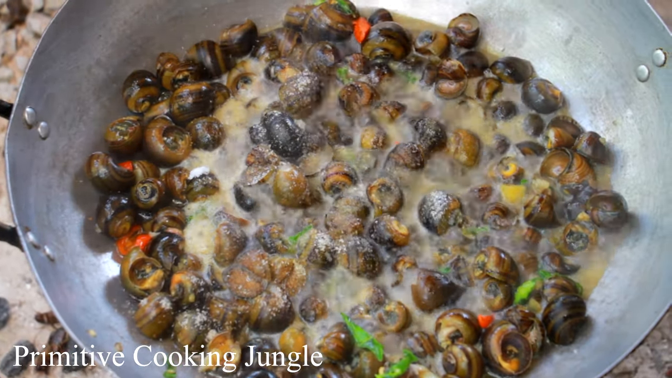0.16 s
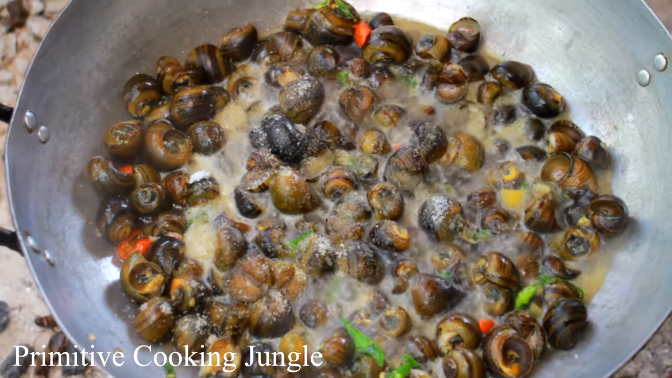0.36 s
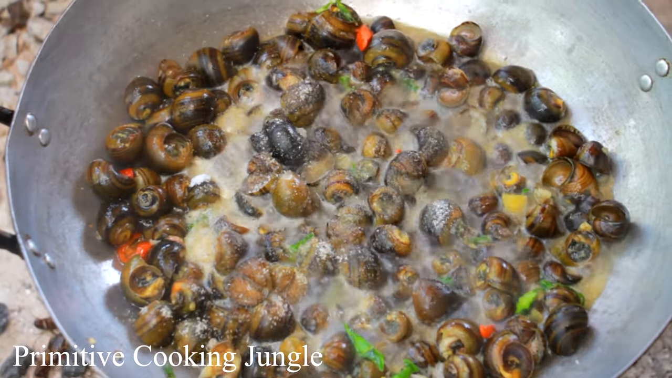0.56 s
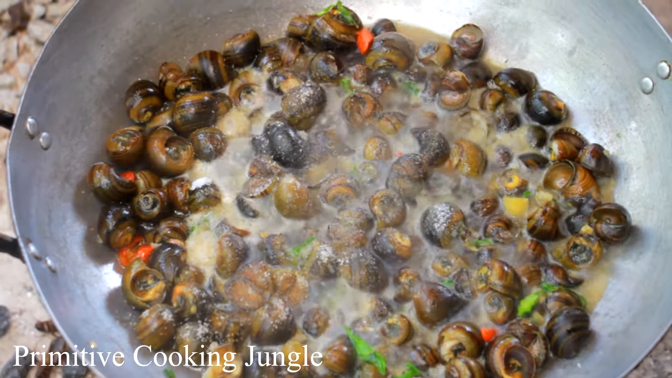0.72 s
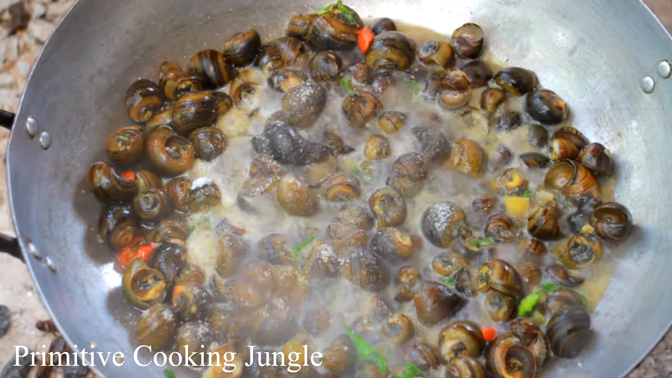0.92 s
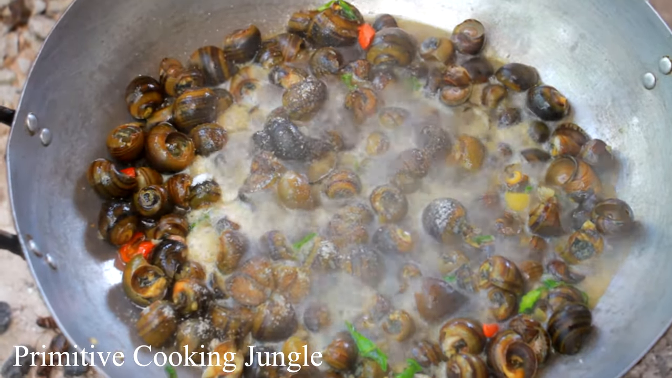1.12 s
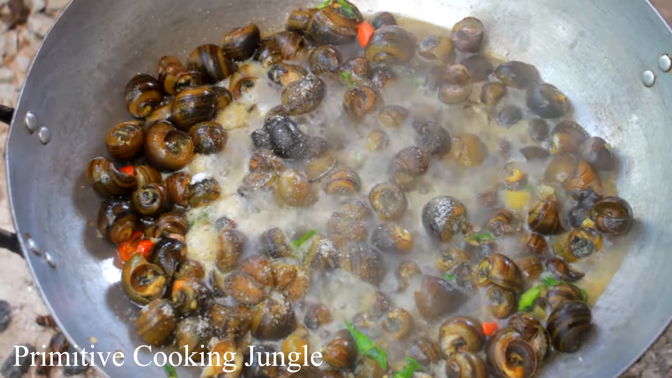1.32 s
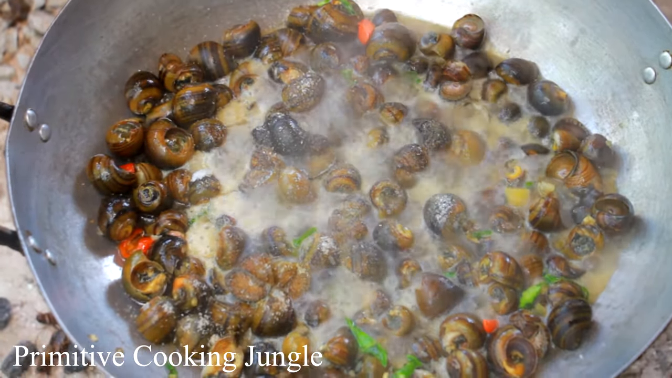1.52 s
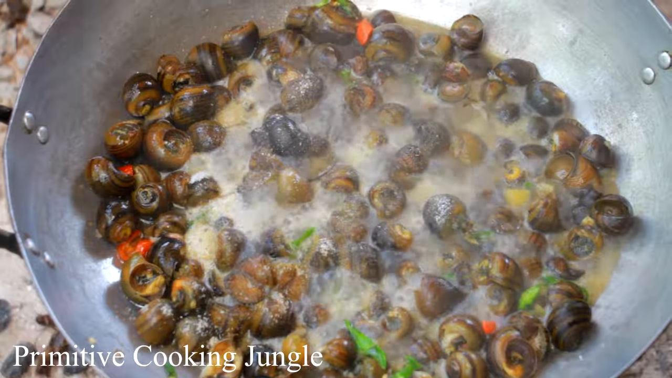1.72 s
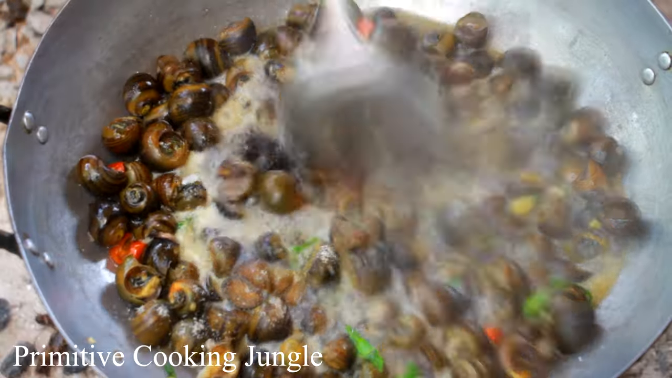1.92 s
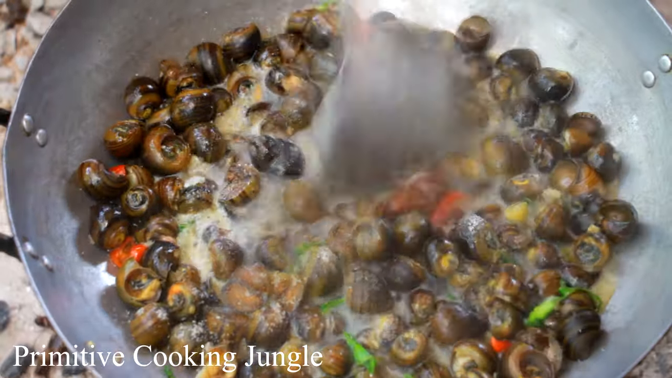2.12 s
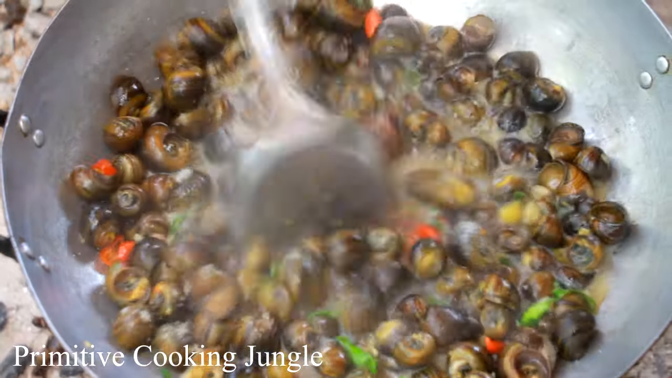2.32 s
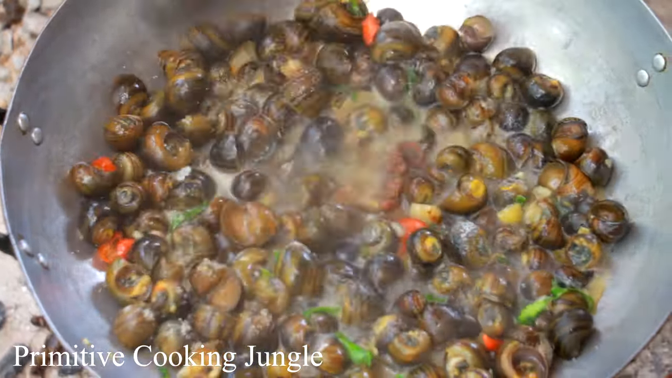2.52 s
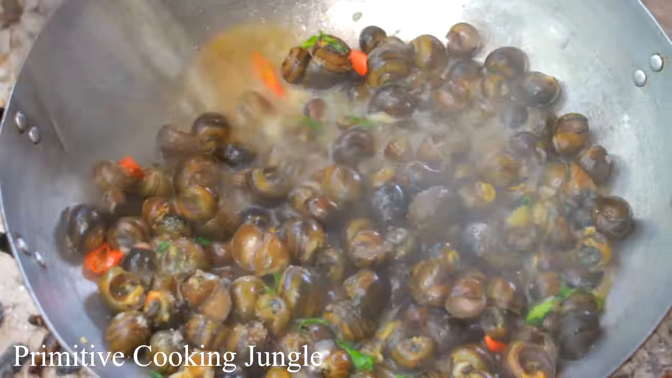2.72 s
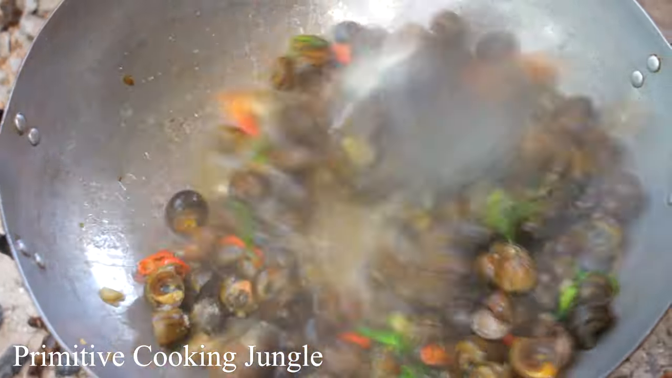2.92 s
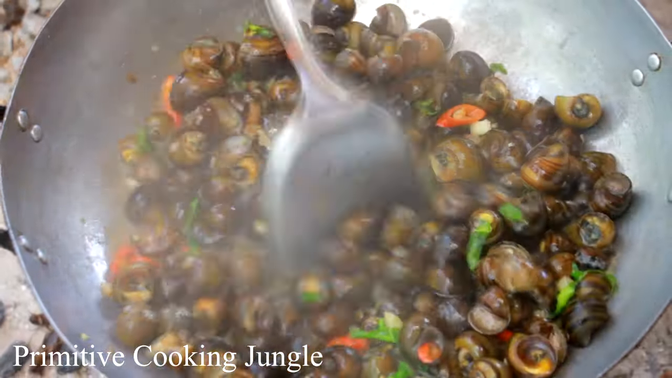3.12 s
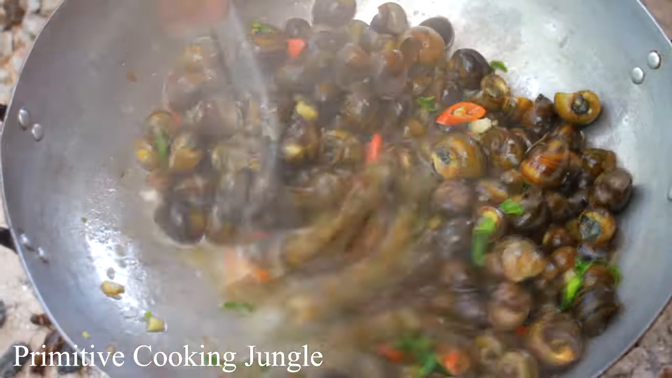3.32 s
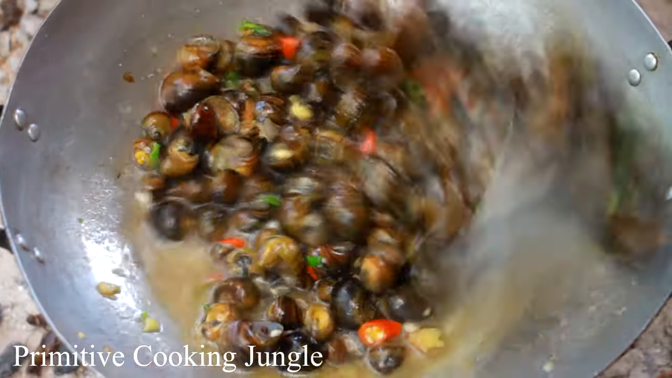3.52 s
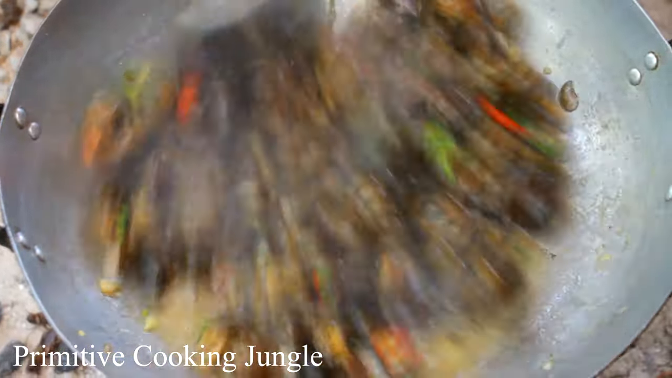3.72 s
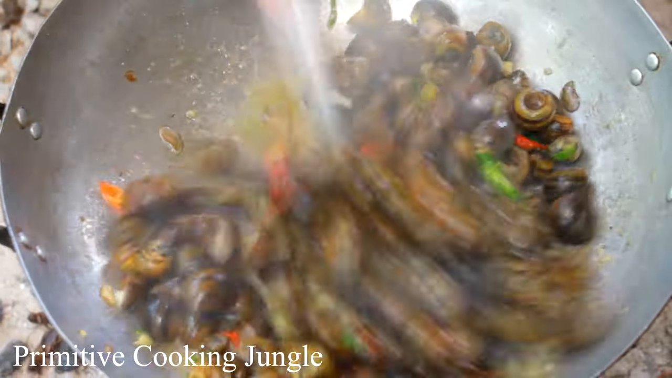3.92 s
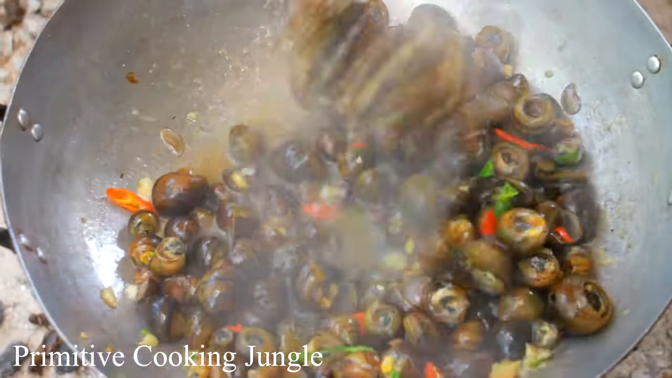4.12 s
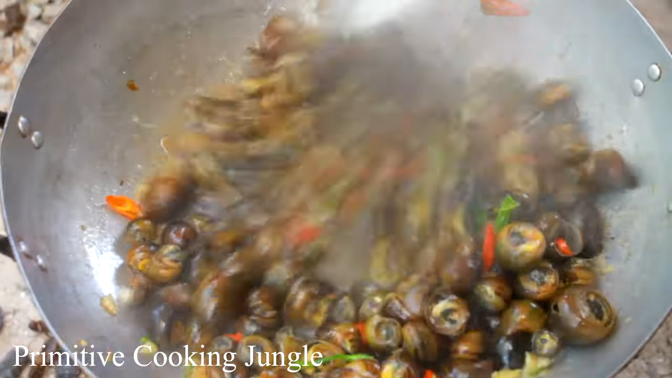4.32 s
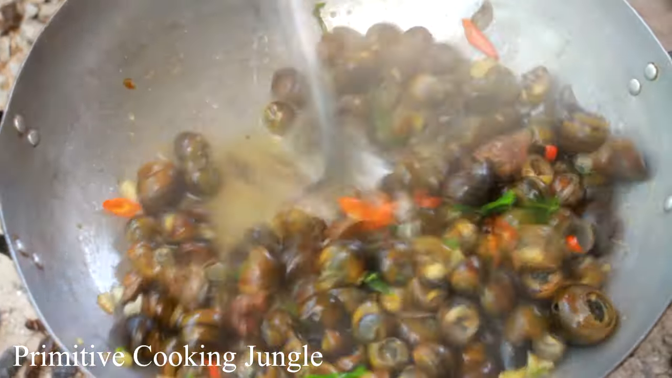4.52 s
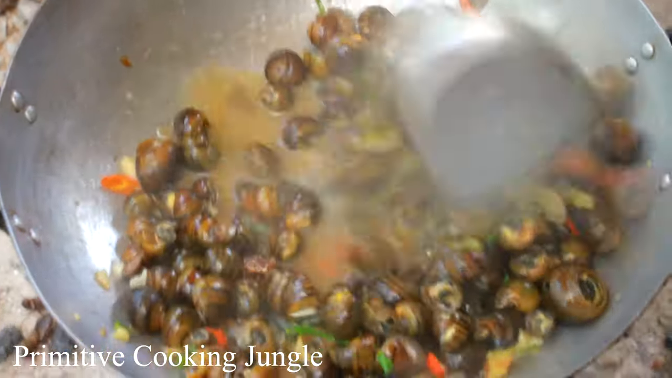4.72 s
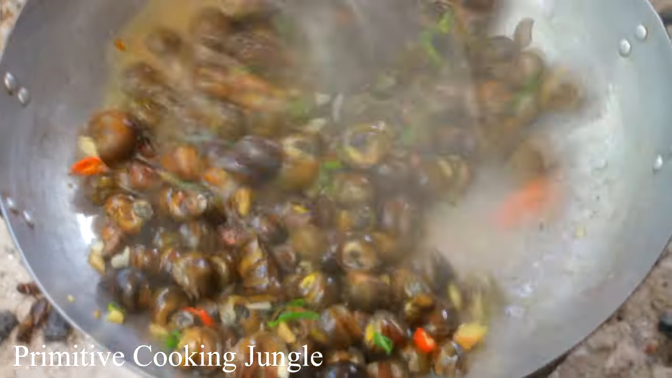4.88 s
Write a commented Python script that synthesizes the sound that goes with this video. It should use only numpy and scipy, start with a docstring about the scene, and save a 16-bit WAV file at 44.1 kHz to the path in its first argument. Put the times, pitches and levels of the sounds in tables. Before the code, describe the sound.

A close, dry, almost centred pickup of outdoor cooking. First comes a faint wet simmer, soft rumble and brief steam puffs, with hoarse falling bird whistles nearby. Then, from about 1.8 seconds, repeated ladle strokes make hundreds of hard little shells collide, scrape and tumble in a resonant metal pan. The strokes are much louder than the opening, crackly and irregular, with short settling rattles between and hardly any lingering ring.

```python
"""Outdoors, snails simmer in a metal wok while birds chirp nearby; then a steel ladle shovels through the
shells. Clatter: damped sine grains and noise, in bursts shaped by the bowl's resonances, plus hard ticks and
knocks. Birds: hoarse falling whistles with a short echo. Simmer: filtered noise with rising bubble grains, fire
rumble, steam and spits. The simmer and rumble grow fainter from about 2 s on."""
import sys
import numpy as np
from scipy import signal
from scipy.fft import rfft, irfft, next_fast_len
from scipy.io import wavfile
from scipy.ndimage import uniform_filter1d, map_coordinates

SR = 44100
rng = np.random.default_rng(int(sys.argv[2]) if len(sys.argv) > 2 else 0)


def to_wav(sig):
    """Store sig (one row per channel, or 1-D mono) as 16-bit WAV at the path in sys.argv[1].

    Samples outside -1..1 are clipped; the rate is SR.
    """
    pcm = np.clip(np.atleast_2d(sig), -1, 1) * 32767
    pcm = np.round(pcm).astype(np.int16)
    wavfile.write(sys.argv[1], SR, pcm.T)  # frames by channels


N = 222793
TOP_HZ = 15900
FADE_FROM_S, FADE_S = 2.05, 0.48  # fade start, time constant
SIMMER_DROP_DB = 12.5

# sharp shell ticks: start_s, relative_level_db, centre_hz
TICK_HITS = [(1.911, -20, 3460), (1.927, -15, 6000), (1.998, -10, 5830), (2.039, -14, 8400),
             (2.127, -8, 8200), (2.141, -0.5, 7500), (2.258, -14, 7760), (2.293, -1.5, 7650),
             (2.306, -4, 7700), (2.559, -4, 5160), (2.576, -1, 4120), (2.721, -26, 4000), (2.734, -8, 4300),
             (2.831, -20, 9500), (2.895, -15, 3430), (2.912, -20, 7540), (2.956, -10, 3470),
             (3.14, -7.5, 5900), (3.265, -6.5, 4000), (3.375, -18, 8300), (3.404, -16, 8000),
             (3.48, -20, 5030), (3.51, -6, 6150), (3.681, -18, 10800), (3.704, -0.5, 4450),
             (3.808, -15, 6540), (3.836, -12, 2440), (3.869, 1.5, 2740), (3.95, -7, 4760),
             (4.101, -11, 4200), (4.115, -14, 5040), (4.146, 0.5, 3030), (4.249, -20, 3840),
             (4.294, -18, 9500), (4.314, -4, 7640), (4.428, -14, 3100), (4.463, -18, 2480),
             (4.731, -7, 5000), (4.81, -19, 2540), (4.955, -0.5, 3600), (4.982, -13, 7500),
             (5.03, -18, 5950)]
# single knocks on the bowl: start_s, relative_level_db, pitch_hz
KNOCK_HITS = [(.516, -20, 904), (.516, -20, 1306), (0.517, -24.5, 356), (1.113, -21, 195),
              (1.124, -21.5, 412), (1.245, -16, 1190), (1.258, -20.5, 1324), (1.946, -18.5, 430),
              (2.114, -22.5, 2400), (2.15, -15.5, 402), (2.319, -18, 405), (2.411, -21, 4050),
              (2.435, -16, 428), (2.559, -19.5, 1360), (2.757, -18, 4090), (3.021, -15.5, 446),
              (3.14, -18, 480), (3.283, -17, 2490), (3.455, -28, 835), (3.945, -22, 1140),
              (4.193, -16, 3830), (4.21, -16.5, 3880), (4.954, -18.5, 1260)]
# steam spectrum: frequency_hz, relative_level_db
STEAM_SPECTRUM = [(3000, -28), (7000, 1), (11000, -5), (16000, -15)]


def amp(db):
    """Gain of a level in dB."""
    return 10 ** (np.asarray(db) / 20)


def unit(x):
    """x at rms 1."""
    return x / np.sqrt(np.mean(x ** 2) + 1e-20)


def along(points, hz):
    """Interpolate (Hz, value) points on a log frequency axis."""
    f, v = np.transpose(points)
    return np.interp(np.log(hz + 1), np.log(f + 1), v, left=v[0], right=v[-1])


def filtered(x, response):
    """x times a complex response of frequency."""
    m = next_fast_len(N + 8192)
    return irfft(rfft(x, m) * response(np.fft.rfftfreq(m, 1 / SR)), m)[..., :N]


def highpass(x, corner_hz):
    """Zero-phase fourth-power high-pass."""
    return filtered(x, lambda hz: hz ** 4 / (hz ** 4 + corner_hz ** 4))


def add(track, s, sound):
    """Mix a sound into the track from time s."""
    part = track[round(s * SR):][:len(sound)]
    part += sound[:len(part)]


def patchy(x, patchy_db):
    """x with patches of random gain in time and pitch."""
    z = signal.stft(np.pad(x, (0, 512)), nperseg=512)[2]
    field = uniform_filter1d(rng.standard_normal(z.shape), 5, 0)
    field = uniform_filter1d(field, 8, 1)
    return signal.istft(z * amp(patchy_db * unit(field)), nperseg=512)[1][:N]


def rush(spectrum, patchy_db):
    """Patchy noise of rms 1 with a given spectrum."""
    noise = patchy(rng.standard_normal(N), patchy_db)
    return unit(filtered(noise, lambda hz: amp(along(spectrum, hz))))


def grains(family, spiky_db, rise=0, count=6000):
    """Damped sines at random moments, pitches and sizes, rms 1; rise bends each pitch upward."""
    centre_hz, octaves, rate_per_s, cycles = family
    gap, big = rng.exponential(size=(2, count))
    start_s = np.cumsum(gap) / rate_per_s
    inside = start_s < N / SR
    pitch_hz = centre_hz * 2 ** (octaves * rng.standard_normal(count))
    pitch_hz = np.clip(pitch_hz, 150, 15000)[inside, None]
    t = np.arange(int(1.5 * cycles / centre_hz * SR)) / SR
    turns = pitch_hz * t
    decay = np.exp(-np.log(100) * turns / cycles)  # 40 dB down after these cycles
    ring = np.sin(2 * np.pi * turns * (1 + rise * turns / cycles)) * decay
    ring *= amp(spiky_db * np.minimum(big[inside, None], 3.5))
    at = (start_s[inside, None] * SR).astype(int) + np.arange(len(t))
    summed = np.bincount(at.ravel(), ring.ravel(), N + len(t))[:N]
    return unit(highpass(summed, centre_hz / 3))  # keep each family free of offset and deep bass


def faded(drop_db, fade_s):
    """Level in dB that sinks exponentially by drop_db from FADE_FROM_S on."""
    since_s = np.maximum(np.arange(N) / SR - FADE_FROM_S, 0)
    return -drop_db * (1 - np.exp(-since_s / fade_s))


def shells():
    """Each ladle push sets shells colliding and sliding: a fast rise, a hold, a decay to rest."""
    # shovel bursts: start_s, hold_s, clack_level_db, boom_over_clack_db
    bursts = [(1.751, 0.012, -38.5, 0), (1.818, 0.03, -38, 1), (1.887, 0.015, -35.5, 5),
              (1.908, 0.034, -27.5, -3), (1.994, 0.029, -33.5, -4), (2.121, 0.036, -31.5, 0.5),
              (2.139, 0.0034, -26, 7.5), (2.198, .043, -30.5, -2.5), (2.292, 0.019, -33, -1.5),
              (2.408, 0.024, -27.5, 0), (2.558, 0.033, -26.5, -8.5), (2.6, 0.087, -36.5, -6),
              (2.722, 0.042, -29, -5), (2.746, 0.03, -28.5, -4.5), (2.784, 0.051, -38.5, 2.5),
              (2.894, .045, -33.5, -6.5), (2.951, 0.027, -29.5, -5), (2.982, 0.047, -27.5, -4.5),
              (3.058, 0.037, -39, -17), (3.113, 0.03, -31.5, -5), (3.162, 0.0042, -30.5, -8),
              (3.261, 0.066, -28, -7.5), (3.395, .008, -33.5, -3), (3.453, 0.03, -29.5, -2),
              (3.493, 0.026, -29.5, -6.5), (3.583, 0.033, -34, -11), (3.699, 0.049, -27.5, -14),
              (3.764, 0.027, -32, -8.5), (3.835, 0.054, -31, -2.5), (3.863, 0.07, -30.5, -3.5),
              (3.945, 0.01, -32, 0.5), (4.048, 0.02, -36, -3), (4.105, .005, -36, 0.5),
              (4.17, 0.018, -33.5, -4.5), (4.181, 0.033, -32, -17), (4.286, 0.055, -29.5, -9.5),
              (4.4247, 0.021, -36.5, -8), (4.46, .055, -29.5, 2), (4.525, 0.021, -36.5, -1),
              (4.605, 0.13, -41.5, -4), (4.697, 0.068, -32, -3), (4.722, 0.024, -26, -19),
              (4.809, 0.016, -29.5, 1), (4.815, 0.04, -32, -9), (4.9518, 0.051, -26, -5.5),
              (5.024, 0.023, -32, -10)]
    # shells settling between bursts, before the family offsets: time_s, level_db
    tumble = [(1.65, -46), (2.0, -44), (2.35, -39), (2.66, -51), (2.71, -42), (2.85, -33), (3.22, -51.5),
              (3.37, -36), (3.44, -40.5), (3.6, -31.5), (3.68, -39.5), (3.9, -49), (4.02, -38.5),
              (4.17, -36), (4.27, -54.5), (4.37, -33.5), (4.42, -50.5), (4.59, -49), (4.89, -32.5),
              (4.94, -48.5)]
    # stray clinks: centre_hz, spread_octaves, contacts_per_s, cycles_to_minus_40_db
    snap = (3600, .5, 90, 22)
    # small dry clicks: centre_hz, spread_octaves, contacts_per_s, cycles_to_minus_40_db
    flick = (7500, .5, 70, 6)
    # contact families, same columns
    clack, boom = (3400, .5, 1100, 10), (431, 0.51, 230, 3.36)
    clank, crisp = (1332, 0.42, 540, 6.5), (8000, .45, 2200, 10)
    strike_s, rise_s, decay_t60_s = 0.00084, 0.0056, 0.11
    clank_db, clank_per_boom_db = 2.53, 0.56
    crisp_db, crisp_per_clack_db = -2.5, 0.11  # harder bursts are crisper
    crisp_drop_db, crisp_fade_s = 6.0, 0.11
    shifting_db = 2.5  # resonances change as the shells roll

    power, t = np.zeros((4, N)), np.arange(SR // 4) / SR
    mean_db = np.mean(bursts, axis=0)[2]
    for s, hold_s, db, boom_db in bursts:
        # a burst that opens on a tick or knock jumps up; any other swells
        struck = any(abs(hit[0] - s) < .007 for hit in TICK_HITS + KNOCK_HITS)
        rise = 1 - np.exp(-t / (strike_s if struck else rise_s))
        shape = rise * amp(-60 * np.maximum(t - hold_s, 0) / decay_t60_s)
        dulling_db = crisp_drop_db * (1 - np.exp(-t / crisp_fade_s))
        levels_db = (
            db,
            db + boom_db,
            db + clank_db + clank_per_boom_db * boom_db,
            db + crisp_db + crisp_per_clack_db * (db - mean_db) - dulling_db,
        )
        for row, level_db in zip(power, levels_db):
            add(row, s, (amp(level_db) * shape) ** 2)

    tumble_s, tumble_db = np.transpose(tumble)
    settling_db = np.interp(np.arange(N) / SR, tumble_s, tumble_db)
    settling = amp(settling_db + np.array([[-.5], [-9.], [-5.], [-7.]]))
    envelopes = np.sqrt(power + settling ** 2)

    # the heap slips unevenly
    jolts = amp(0.51 * map_coordinates(rng.standard_normal(N // 200 + 4), [np.arange(N) / 200]))
    sound = 0.29 * envelopes[0] * grains(snap, spiky_db=-2.0, count=600)
    sound += amp(-9.5) * envelopes[3] * grains(flick, spiky_db=2.0, count=600)
    for envelope, family in zip(envelopes, (clack, boom, clank, crisp)):
        centre_hz, octaves = family[:2]
        contacts = grains(family, spiky_db=-0.5, count=14000)
        scrape = filtered(
            rng.standard_normal(N),
            lambda hz: np.exp(-(np.log2((hz + 1) / centre_hz) / octaves) ** 2 / 4))
        # sliding fills in between contacts
        heap = patchy(contacts + .4 * unit(scrape), shifting_db)
        sound = sound + envelope * unit(jolts * filtered(heap, bowl))
    return sound


def bowl(hz):
    """The wok's resonances lift nearby frequencies, on top of the clatter's overall tone."""
    # bowl resonances: centre_hz, width_hz, level_db
    modes = [(427.5, 8.1, 7), (503.8, 10.7, 8), (1130, 230, -4), (1275, 17, -2.5), (2665, 31, -2),
             (4040, 110, -8), (4240, 1500, -4), (6170, 850, 7)]
    # overall tone of the clatter: frequency_hz, gain_db
    tone = [(1500, 4), (4500, 4), (5300, -6.5), (9000, 0.5), (16000, -9.5)]
    resonance = 1
    for c, w, db in modes:
        resonance = resonance + amp(db) * 1j * hz * w / (c * c - hz * hz + 1j * hz * w)
    return amp(along(tone, hz)) * resonance


def ticks():
    """Hard shell on shell: a noise crack and many high modes that die within milliseconds."""
    track, t = np.zeros(N), np.arange(SR // 50) / SR
    ring_t60_s, crack_t60_s = 0.013, .006
    for s, db, hz in TICK_HITS:
        modes_hz = hz * 2 ** (0.5 * rng.standard_normal((40, 1)))
        phase = 2 * np.pi * rng.random(modes_hz.shape)
        ring = (np.sin(2 * np.pi * modes_hz * t + phase) * (modes_hz < TOP_HZ)).sum(axis=0)
        add(track, s, amp(db - 25.0 - 60 * t / ring_t60_s) * ring)
        add(track, s, amp(db - 14 - 60 * t / crack_t60_s) * rng.standard_normal(len(t)))
    return filtered(track, lambda hz: 1 / (1 + 1j * hz / 11000) ** 2)


def knocks():
    """Single shells or the ladle hit the bowl as decaying modes; the ladle also rings free."""
    # ladle modes: pitch_hz, relative_level_db, t60_s
    ladle = [(1310, -0.5, 0.33), (2510, -12, 0.39), (2600, -11, 0.17), (8800, -10, 0.052)]
    # free rings of the ladle: start_s, relative_level_db
    pings = [(3.177, -31.5), (3.778, -30.5)]
    t60_at_1khz_s, t60_power = 0.047, 0.15  # higher knocks ring shorter
    track, t = np.zeros(N), np.arange(SR // 2) / SR
    for s, db, hz in KNOCK_HITS:
        t60_s = t60_at_1khz_s * (1000 / hz) ** t60_power
        if hz > 3000:  # several shells at once: a tight cluster of modes
            spread, phase = rng.random((2, 9, 1))
            modes_hz = hz * 2 ** (0.39 * (spread - .5))
            tone = np.sin(2 * np.pi * (modes_hz * t + phase)).sum(axis=0) / 2
        else:
            tone = np.sin(2 * np.pi * hz * t)
            tone += .5 * np.sin(2 * np.pi * 1.214 * hz * t)
            tone += 0.39 * np.sin(2 * np.pi * .72 * hz * t)
        add(track, s, amp(db - 60 * t / t60_s) * tone * (1 - np.exp(-t / 0.00034)))
    for s, db in pings:
        ring = sum(amp(level_db - 60 * t / t60_s) * np.sin(2 * np.pi * hz * t)
                   for hz, level_db, t60_s in ladle)
        add(track, s, amp(db) * ring * (1 - np.exp(-t / 0.0025)))
    return track


def birds():
    """Falling whistles, their amplitude ever rougher through the note, smeared by echoes off leaves."""
    # lower birds: start_s, length_s, start_hz, relative_level_db
    chirps = [(0.037, 0.05, 3180, -34.5), (0.243, 0.046, 2620, -28), (0.253, 0.03, 3340, -31),
              (0.354, 0.037, 2315, -30.5), (0.752, 0.034, 2500, -34.5), (0.896, 0.028, 2740, -35.5),
              (1.151, 0.043, 3040, -32), (1.168, .026, 2414, -25), (1.494, .05, 3150, -39.5),
              (1.529, 0.036, 2290, -32.5), (1.607, 0.032, 2495, -32.5)]
    # high bird's note: length_s, start_hz, end_hz, glide_bend
    song = (.055, 6600, 4950, 2.1)
    # high bird's calls: start_s, relative_level_db
    notes = [(0.027, -32), (0.159, -31.5), (0.293, -32), (0.433, -32.5), (0.573, -33.5), (0.714, -33.5),
             (.875, -44), (2.225, -36), (2.511, -41)]
    end_over_start, chirp_bend = .8, 1.23  # bend 1 = straight glide
    echo_t60_s = 0.063
    track = np.zeros(N)
    hoarse = unit(filtered(rng.standard_normal(N), lambda hz: np.exp(-(hz / 450) ** 2)))
    lower = [(s, length_s, hz, end_over_start * hz, chirp_bend, db) for s, length_s, hz, db in chirps]
    high = [(s, *song, db) for s, db in notes]
    for s, length_s, start_hz, end_hz, bend, db in lower + high:
        u = np.linspace(0, 1, int(length_s * SR))
        hz = end_hz + (start_hz - end_hz) * (1 - u) ** bend
        swell = np.sqrt(np.abs(np.sin(np.pi * u)))
        flutter = 0.55 + 1.5 * u * hoarse[round(s * SR):][:len(u)]
        add(track, s, amp(db) * swell * flutter * np.sin(2 * np.pi * np.cumsum(hz) / SR))
    t = np.arange(SR // 8) / SR
    leaves = rng.standard_normal(len(t)) * amp(-60 * t / echo_t60_s)
    echo = signal.fftconvolve(track, leaves / np.linalg.norm(leaves))[:N]
    return 0.59 * track + 0.7 * echo


def simmer():
    """Sauce bubbles rise in pitch and hiss over the fire's low rumble; steam spits and a puff dies away."""
    # fire spectrum: frequency_hz, relative_level_db
    rumble = [(12, -30), (22, -3.5), (45, -9), (110, -5), (200, -16), (300, -58)]
    # sauce spectrum: frequency_hz, relative_level_db
    sauce_spectrum = [(100, -72), (200, -1), (420, 2.5), (850, -2.5), (2500, -10.5), (4000, -16.5),
                      (7000, -21), (16000, -31.5)]
    sauce_db, rumble_db, rumble_drop_db = -37, -41.5, 15.5
    hiss_hz, hiss_drop_db = 6000, 25  # the treble sinks this much further
    steam_db, steam_fade_db_per_s = -48, 33
    # grain families: centre_hz, spread_octaves, grains_per_s, cycles_to_minus_40_db
    bubbles = grains((543, 0.786, 120, 19.8), spiky_db=1.5, rise=0.4, count=1000)
    fizz = grains((13000, 0.46, 110, 2.2), spiky_db=0, count=500)
    sauce = rush(sauce_spectrum, patchy_db=2) + .4 * bubbles + .04 * fizz
    hiss = highpass(sauce, hiss_hz)
    sauce = sauce - hiss + amp(faded(hiss_drop_db, FADE_S)) * hiss
    sauce = amp(sauce_db + faded(SIMMER_DROP_DB, FADE_S)) * sauce
    fire = amp(rumble_db + faded(rumble_drop_db, FADE_S)) * rush(rumble, patchy_db=1.5)
    steam_level_db = steam_db - steam_fade_db_per_s * np.arange(N) / SR
    steam = amp(steam_level_db) * rush(STEAM_SPECTRUM, patchy_db=5.0)
    return sauce + fire + steam + spits()


def spits():
    """Short soft puffs of steam: noise under Gaussian envelopes."""
    # steam spits from the sauce: start_s, relative_level_db
    puffs = [(0.0518, -42), (0.0994, -35), (0.1635, -32), (0.8194, -36), (1.4965, -35)]
    half_s = 0.009
    t = np.arange(N) / SR
    envelope = sum(amp(db - 10.5) * np.exp(-((t - s - half_s) / half_s) ** 2) for s, db in puffs)
    return envelope * rush(STEAM_SPECTRUM, patchy_db=3.0)


def side_hiss():
    """Faint treble noise, opposite in the two channels, that fades with the simmer."""
    level_db = -66.5 + faded(SIMMER_DROP_DB, FADE_S)
    return amp(level_db) * rush([(7000, -29), (10000, -13), (16000, -9)], patchy_db=-5)


def scene():
    """All sources sit in both channels alike, the clatter without deep bass, but for the side hiss."""
    clatter = highpass(shells() + ticks() + knocks(), 150)
    mid = clatter + birds() + simmer()
    side = side_hiss()
    return np.array([mid + side, mid - side])


def record(dry):
    """Round off peaks, band-limit, add a small offset in each channel that shrinks after about 2 s."""
    offset_lr, offset_drop_db, offset_fade_s = (.011, .0148), 16, .25
    rounded = dry / (1 + np.abs(dry / .42) ** 4) ** (1 / 4)
    offset = np.outer(offset_lr, amp(faded(offset_drop_db, offset_fade_s)))
    return filtered(rounded, lambda hz: hz < TOP_HZ) + offset


dry = scene()
out = record(dry)
to_wav(out)
```